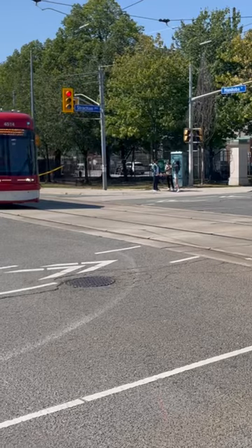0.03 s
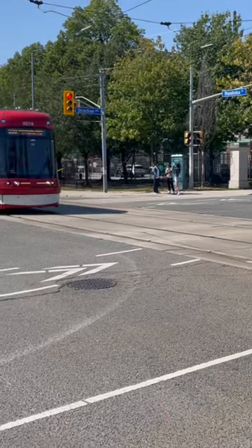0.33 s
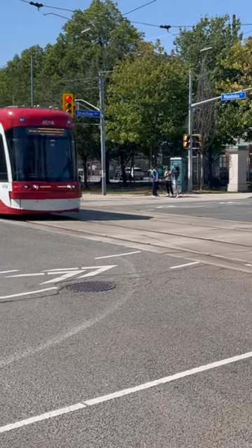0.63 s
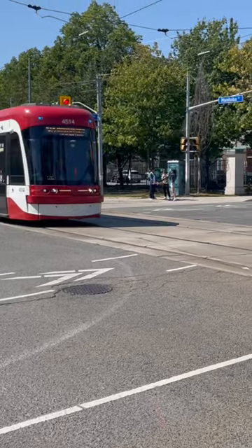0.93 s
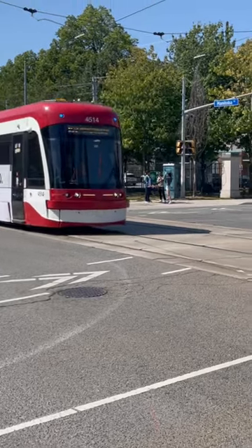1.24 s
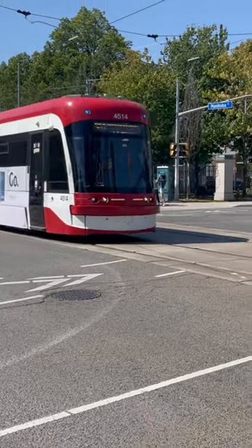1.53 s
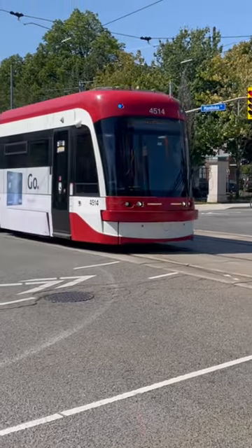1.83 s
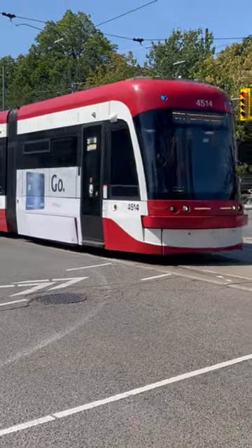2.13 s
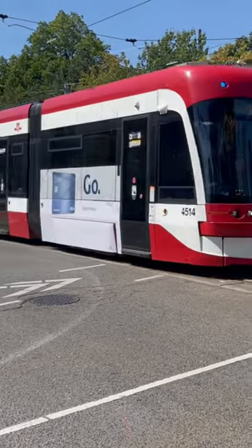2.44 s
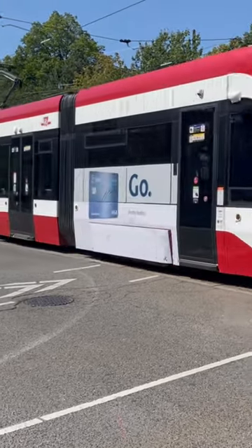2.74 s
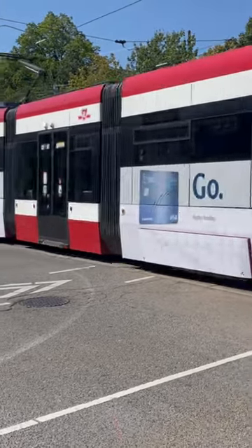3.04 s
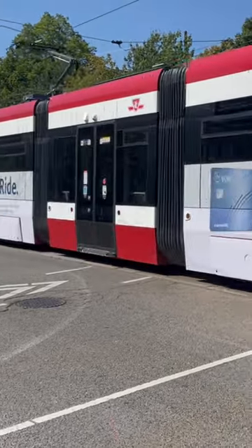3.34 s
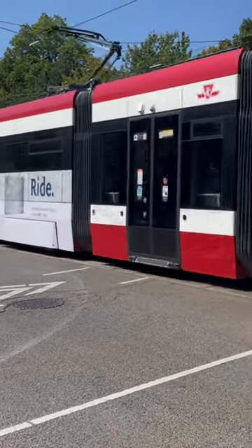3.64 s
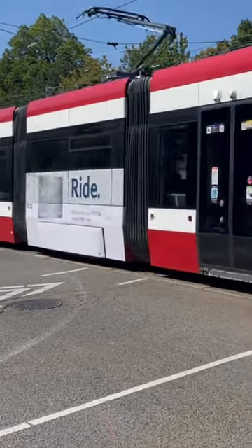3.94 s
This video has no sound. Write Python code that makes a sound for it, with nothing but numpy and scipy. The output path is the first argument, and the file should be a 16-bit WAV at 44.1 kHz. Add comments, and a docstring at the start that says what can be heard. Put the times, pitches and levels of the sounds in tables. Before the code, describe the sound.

A streetcar approaches slowly with a low rumble over faint distant traffic. Steel hiss joins at about 1 second. Wheels clack over a rail joint at 1.4 and 1.7 seconds, with tiny squeaks. From 2.5 seconds the rumble and ringing of the rails grow, with a brief squeak at 2.7. Louder clacks land at 3.2 and 3.5 seconds, echoing shortly, and a faint motor whine swells as it draws level.

```python
"""Street crossing, a few metres from the track: a streetcar rolls up slowly and draws level with a phone.
Its wheels shake the slab, drum the body and ring wheels and rails. The steel hisses and sings,
flanges squeak and the drive whines faintly. Two pairs of wheels clack over a rail joint;
the street answers with a short echo over distant traffic."""
import sys
import numpy as np
from scipy import signal
from scipy.fft import rfft, irfft
from scipy.io import wavfile
from scipy.ndimage import uniform_filter1d

SR = 44100
rng = np.random.default_rng(int(sys.argv[2]) if len(sys.argv) > 2 else 0)


def file_out(sig):
    """Save sig as 16-bit WAV at sys.argv[1]."""
    # one column per channel
    cols = np.atleast_2d(sig).T
    # limit, then scale
    lim = np.clip(cols, -1, 1)
    pcm = np.round(lim * 32767).astype(np.int16)
    wavfile.write(sys.argv[1], SR, pcm)


N = 176400
TIME_S = np.arange(N) / SR
BIN_HZ = np.maximum(np.arange(N // 2 + 1) * SR / N, 1)


def undb(db):
    """Decibels to gain."""
    return 10 ** (np.asarray(db) / 20)


def unit(x):
    """Scale to rms 1."""
    return x / np.sqrt(np.mean(x ** 2))


def envelope(points):
    """Gain over time from (t/s, level/dB) points."""
    return undb(np.interp(TIME_S, *np.array(points).T))


def over_hz(points):
    """Join (f/Hz, value) points on a log-frequency axis."""
    hz, value = np.array(points).T
    return np.interp(np.log(BIN_HZ), np.log(hz), value)


def spectrum(points):
    """Gain from (f/Hz, level/dB) points, falling 12 dB/octave outside them."""
    below = np.minimum(BIN_HZ / points[0][0], 1)
    above = np.minimum(points[-1][0] / BIN_HZ, 1)
    return undb(over_hz(points)) * (below * above) ** 2


def colour(x, gain):
    """Filter by a gain per bin; rms 1."""
    return unit(irfft(rfft(x) * gain, N))


def noise():
    """Two independent noises: direct path, street-scattered path."""
    return rng.standard_normal((2, N))


def wander(rate_hz):
    """Smooth random drift; rms 1."""
    return colour(rng.standard_normal(N), 1 / (1 + (BIN_HZ / rate_hz) ** 4))


def response(points):
    """Minimum-phase frequency response of unit energy from (f/Hz, level/dB) points."""
    cepstrum = irfft(np.log(undb(over_hz(points))), N)
    cepstrum[1:N // 2] *= 2
    cepstrum[N // 2 + 1:] = 0
    gain = np.exp(rfft(cepstrum))
    return gain / np.sqrt(np.mean(abs(gain) ** 2))


def vibration(points, steady, window_samples=4400):
    """Shaped noise, rms 1; steady (0-1) evens out its swells."""
    x = colour(noise(), spectrum(points))
    power = uniform_filter1d(x ** 2, window_samples, axis=1)
    return unit(x / np.maximum(power, 1e-6) ** (steady / 2))


def strike(start_s, contact, snap_share):
    """Spectrum of a blow: a snap holding snap_share of the direct energy, then a crunch."""
    force = noise() * contact
    force[0] *= np.sqrt(1 - snap_share)
    force[0, int(start_s * SR) + 1] += np.sqrt(snap_share * np.sum(contact ** 2))
    return rfft(force)


def running_gear():
    """The car's weight rumbles the slab, drums the body, roars in the bogies, drones under the skirts."""
    # envelopes: t/s, level/dB
    slab_level = [(0.06, -30.5), (.3, -28.5), (.55, -28.5), (.75, -27), (.88, -37), (1.0, -23), (1.15, -28),
                  (1.4, -24.5), (1.75, -26), (1.95, -26), (2.33, -31), (2.55, -25), (2.7, -19.5),
                  (2.8, -25), (3.08, -20.5), (3.4, -25.5), (3.53, -19), (3.66, -28), (3.75, -25.5),
                  (4, -22)]
    body_level = [(0.06, -28), (.4, -29), (.75, -29), (1.05, -28.5), (1.4, -25.5), (1.95, -22.5),
                  (2.25, -28), (2.6, -32), (3.4, -30.5), (4, -34)]
    bogie_level = [(0.06, -35), (.2, -31), (.65, -34.5), (1.5, -33), (1.8, -32), (2.05, -36.5), (2.45, -33),
                   (2.8, -29), (2.93, -29.5), (3.03, -26), (3.15, -32.5), (3.27, -26.5), (3.38, -30.5),
                   (3.72, -26), (3.85, -29), (4, -28.5)]
    skirt_level = [(0, -53.5), (.8, -34), (1.7, -40.5), (2.5, -57.5), (3.1, -36), (3.6, -28.5), (4, -33)]
    # spectra: f/Hz, level/dB
    slab_shape = [(20, -40), (33, -34), (43, -7.5), (52, 5), (58, 5), (69, 3.5), (80, -6.5), (110, -27.5),
                  (200, -55.5)]
    body_shape = [(55, -25), (82, 2.5), (120, 0.5), (170, -2.5), (230, -8.5), (320, -23.5), (700, -55)]
    bogie_shape = [(120, -19), (205, -13), (290, -4), (362, 1.5), (420, -3.5), (500, -18.5), (620, -10.5),
                   (1200, -45.5)]
    skirt_shape = [(120, -33), (170, -5.5), (205, -0.5), (265, -3), (320, -13), (500, -38.5)]
    slab = vibration(slab_shape, steady=0.41) * envelope(slab_level) * undb(0.5)
    body = vibration(body_shape, steady=0.67) * envelope(body_level) * undb(0.38)
    bogies = vibration(bogie_shape, steady=0.12) * envelope(bogie_level) * undb(0.5)
    skirts = vibration(skirt_shape, steady=0.24) * envelope(skirt_level)
    return slab + body + bogies + skirts


def rolling(turn_hz=2.4, turn_db=0.6, grit_per_s=230, grit_db=-16.5):
    """Rough treads and crushed grit ring rails and wheels, swelling once a wheel turn."""
    # ringing as the car nears: t/s, level/dB
    rail_level = [(0.06, -42), (.9, -44), (1.25, -41.5), (2.0, -39), (2.35, -36.5), (2.7, -35.5),
                  (3.15, -33.5), (3.6, -31.5), (4, -32.5)]
    wheel_level = [(0, -52.5), (1.0, -45.5), (1.6, -44.5), (2.0, -41), (2.35, -41), (2.65, -31.5),
                   (3.1, -34), (3.5, -31.5), (3.8, -33.5), (4, -30)]
    # rail spectrum: f/Hz, level/dB
    rail_shape = [(300, -16), (540, -15.5), (660, 0.5), (950, -3), (1250, -9), (1750, -12.5), (2100, -16.5),
                  (3300, -22), (4000, -25), (4650, -34), (5400, -27), (7000, -36.5), (15000, -52.5)]
    # wheel resonances: f/Hz, width/Hz, level/dB
    resonances = [(647, 80, 1.5), (893, 51, -4), (1488, 27, 3), (1532, 160, -2), (1695, 120, -0.5),
                  (2460, 200, -12.5), (2927, 100, -10.5), (3826, 130, -17)]
    grit = (rng.random(N) < grit_per_s / SR) * rng.standard_normal(N)
    force = (noise() + undb(grit_db) * unit(grit)) * undb(0.77 * wander(17))
    rails = colour(force, spectrum(rail_shape)) * envelope(rail_level) * undb(1.02)
    wheel_power = sum((undb(db) / (1 + 2 * ((BIN_HZ - hz) / width_hz) ** 2)) ** 2
                      for hz, width_hz, db in resonances)
    wheels = colour(noise(), np.sqrt(wheel_power)) * envelope(wheel_level) * undb(1.7 * wander(9.6))
    return (rails + wheels) * undb(turn_db * np.sin(2 * np.pi * turn_hz * TIME_S))


def clacks(pivot_hz=4200, rattle_rise_s=0.0017, rattle_decay_s=0.039, echo_decay_s=0.056, echo_db=-11):
    """Each wheel ticks on the rail end, clunks down and rings; the bogie rattles, the street echoes."""
    # blows: t/s, tick/dB, tick tilt/(dB/octave), clunk/dB, clunk cutoff/Hz, contact/s, rattle/dB, ring/dB
    blows = [(1.4315, -25, -7, -34, 3000, .0021, -34.5, -34), (1.478, -49, -5, -20, 900, .003, -56, -43),
             (1.7078, -21, 1, -32.5, 3000, .0014, -33.5, -33.5),
             (1.745, -42, 4, -31.5, 2030, .012, -48, -37.5), (2.941, -38, -8, -31.5, 3040, .006, -44, -33),
             (3.206, -18.5, 3, -36.5, 4040, 0.0032, -35.5, -37),
             (3.245, -44, -1, -17, 2500, 0.012, -37.5, -48), (3.2565, -47, 0, -22, 2000, 0.0069, -47, -44),
             (3.5074, -35, -8, -16.5, 6000, 0.015, -35, -34.5)]
    # spectra: f/Hz, level/dB
    tick_shape = [(1000, -27.5), (2400, -9), (3100, 3), (3650, 6.5), (4350, -3.5), (4800, -18),
                  (5350, -4.5), (6000, 2), (6900, -15), (10000, -20.5), (15000, -33)]
    clunk_shape = [(60, -15.5), (300, -7.5), (700, 5.5), (1100, -2), (1700, 0), (2400, -15.5), (3200, -8),
                   (4200, -35.5), (9000, -25.5)]
    rattle_shape = [(500, -14.5), (1200, -1), (2400, 1.5), (3600, -0.5), (4800, -8), (6200, -4.5),
                    (9000, -12.5), (15000, -20.5)]
    # struck wheel: f/Hz, level/dB, decay/s
    modes = [(1154, -6.5, .035), (2327, -5.5, 0.011), (2690, -7, .013), (3040, -3, 0.0066),
             (3730, -3.5, .011), (4260, -9.5, .008), (6020, -13, 0.0073)]
    rattle_power, ringing = np.zeros((2, N))
    ticks = clunks = 0
    octaves = np.clip(np.log2(BIN_HZ / pivot_hz), -1, 1)
    for start_s, tick_db, tilt, clunk_db, cutoff_hz, contact_s, rattle_db, ring_db in blows:
        age_s = np.maximum(TIME_S - start_s, 0)
        contact = (age_s > 0) * np.exp(-np.minimum(age_s / contact_s, 50))
        echo = (age_s > 0) * undb(echo_db) * np.exp(-age_s / echo_decay_s)
        ticks += strike(start_s, contact, snap_share=0.65) * undb(tick_db + tilt * octaves)
        clunk = strike(start_s, contact, snap_share=0.44) + rfft(noise() * echo)
        clunks += clunk * undb(clunk_db) / np.hypot(1, (BIN_HZ / cutoff_hz) ** 2)
        rise = 1 - np.exp(-age_s / rattle_rise_s)
        rattle_power += (undb(rattle_db) * rise * np.exp(-age_s / rattle_decay_s)) ** 2
        for hz, db, decay_s in modes:
            detuned_hz = hz * (1 + 0.008 * rng.standard_normal())
            ringing += undb(ring_db + db) * np.exp(-age_s / decay_s) * np.sin(2 * np.pi * detuned_hz * age_s)
    rattle = rfft(noise() * np.sqrt(rattle_power)) * response(rattle_shape)
    out = irfft(ticks * response(tick_shape) + clunks * response(clunk_shape) + rattle, N)
    out[0] += ringing  # direct path only
    return out


def hiss(flutter_db=2):
    """Steel slides on steel with a slightly uneven hiss."""
    # envelope: t/s, level/dB
    level = [(0, -75), (.78, -60), (.86, -50.5), (.96, -51), (1.05, -42), (1.2, -45), (1.4, -41.5),
             (1.9, -48), (2.3, -47), (2.6, -44.5), (3.0, -42.5), (3.4, -44.5), (4, -45.5)]
    # spectrum: f/Hz, level/dB
    shape = [(700, -12.5), (1200, 8), (2200, 5.5), (3000, 2.5), (3800, -3), (4100, -1.5), (4800, -6.5),
             (5150, -5), (5600, 0), (6700, -3), (8000, -6), (10500, -21), (13500, -13.5), (15500, -38.5)]
    return colour(noise(), undb(over_hz(shape))) * envelope(level) * undb(0.5 + flutter_db * wander(12))


def singing(drift=0.005, flutter_db=2):
    """Rubbing steel sings in narrow bands that drift and flutter."""
    # bands: f/Hz, width/Hz, level/dB
    bands = [(1600, 31, 4.5), (2980, 51, -5), (3670, 70, -1.5), (4550, 20, -10), (5147, 110, -0.5)]
    # envelope: t/s, level/dB
    level = [(0, -67.5), (.8, -64), (1.4, -59.5), (2.1, -54.5), (2.6, -53), (3.0, -54), (3.4, -54.5),
             (4, -53)]
    out = np.zeros((2, N))
    for hz, width_hz, db in bands:
        phase = 2 * np.pi * np.cumsum(hz * (1 + drift * wander(6.03))) / SR
        lowpass = 1 / (1 + (BIN_HZ / width_hz) ** 4)
        band = colour(noise(), lowpass) * np.cos(phase) + colour(noise(), lowpass) * np.sin(phase)
        out += band * undb(db + flutter_db * wander(10))
    return out * envelope(level)


def squeaks(waver_hz=14):
    """A flange touches the rail and the wheel sings briefly; direct path only."""
    # touches: t/s, f/Hz, width/s, level/dB
    touches = [(1.443, 2270, 0.0042, -36), (1.6, 1542, .02, -35.5), (1.76, 1125, .012, -34),
               (2.17, 1495, 0.013, -43), (2.695, 1697, 0.0078, -29)]
    out = np.zeros((2, N))
    for peak_s, hz, width_s, db in touches:
        swell = np.exp(-((TIME_S - peak_s) / width_s) ** 2 / 2)
        phase = 2 * np.pi * np.cumsum(hz + waver_hz * wander(37)) / SR
        out[0] += undb(db) * swell * np.sin(phase)
    return out


def whine(sag_per_s=0.015, jitter=1.3, flutter_db=4):
    """Wavering drive tones swell, sink in pitch and fade as the bogie draws level."""
    # tones: f/Hz, waver/Hz, level/dB, peak t/s, width/s
    tones = [(684, 16, -39, 3.7, 0.19), (1463, 8.7, -38.5, 3.8, 0.2), (1670, 10, -43.5, 3.8, 0.24),
             (4330, 7.5, -53, 3.73, 0.18), (5000, 41, -49.5, 3.8, .14), (5160, 60, -49, 3.93, 0.17)]
    out = np.zeros((2, N))
    for hz, waver_hz, db, peak_s, width_s in tones:
        since_s = TIME_S - peak_s
        swell = 1 / (1 + (since_s / width_s) ** 2)
        pitch_hz = hz * (1 - sag_per_s * since_s) + waver_hz * wander(14.1)
        for path in out:
            phase = 2 * np.pi * np.cumsum(pitch_hz + jitter * waver_hz * wander(150)) / SR
            path += np.sqrt(2) * np.sin(phase) * undb(db + flutter_db * wander(29)) * swell
    return out


def traffic(level_db=-39.5):
    """Distant traffic: a low, near-steady wash."""
    # spectrum: f/Hz, level/dB
    shape = [(25, -20), (70, -4), (200, -15), (420, -5.5), (800, -11), (1300, -36), (2500, -32),
             (3800, -41), (4500, -52), (6000, -38.5), (8000, -46.5), (15000, -61)]
    return colour(noise(), undb(over_hz(shape))) * undb(level_db + 0.2 * wander(2))


def scene():
    """The sound reaches two microphone ports, part direct, part scattered by the street."""
    # scattered re direct: f/Hz, level/dB
    diffuse = [(60, -33.5), (120, -17.5), (250, -10.5), (400, -7.5), (580, -0.5), (1000, -2.5), (1600, -9),
               (3000, -4.5), (6000, -8), (8000, -36), (10000, -40), (14000, -29)]
    # left port re right: f/Hz, level/dB
    balance = [(60, .4), (120, .7), (200, -.5), (380, -6.1), (700, -3.3), (1290, -1.2), (2400, -.3),
               (15000, 0)]
    # left port's lead: f/Hz, phase/rad
    lead = [(70, 0), (160, -.25), (430, -1.15), (680, .6), (860, 1.0), (1250, .4), (2000, .1), (2600, .9),
            (3900, .7), (4500, 1.4), (5250, -.1), (8000, 2.1), (9000, 3.0), (12000, 3.4), (13300, 5.9),
            (15000, 6.3)]
    streetcar = running_gear() + rolling() + hiss() + singing() + whine() + clacks() + squeaks()
    direct, scattered = rfft(streetcar + traffic())
    sides = np.array([[1], [-1]])
    scatter_gain = undb(over_hz(diffuse))
    field = (direct + sides * scatter_gain * scattered) / np.hypot(1, scatter_gain)
    port_gain = undb(sides * over_hz(balance) / 2)
    right_lag = np.exp(1j * np.array([[0], [-1]]) * over_hz(lead))
    return irfft(field * port_gain * right_lag, N)


def record(dry):
    """The phone opens after a moment and cuts the top treble."""
    open_s, fade_s, cutoff_hz = 0.036, 0.003, 15400
    opened = dry * np.clip((TIME_S - open_s) / fade_s, 0, 1)
    return signal.sosfilt(signal.ellip(8, 0.2, 70, cutoff_hz, fs=SR, output="sos"), opened)


dry = scene()
out = record(dry)
file_out(out)
```